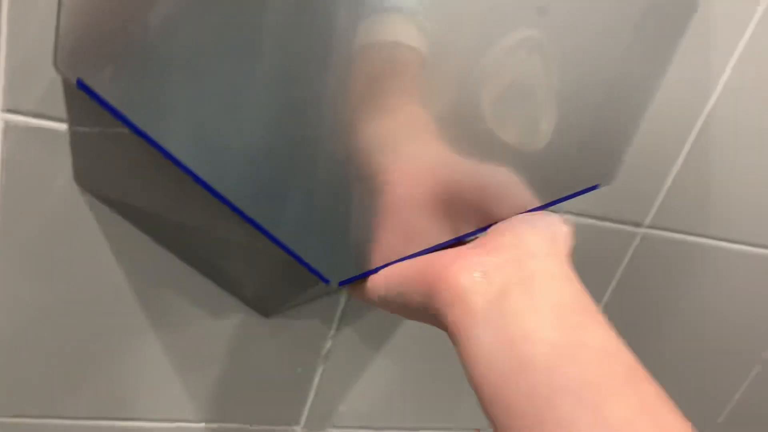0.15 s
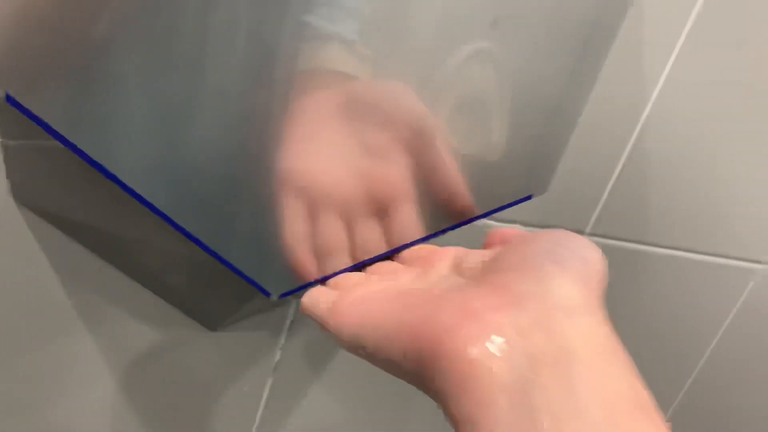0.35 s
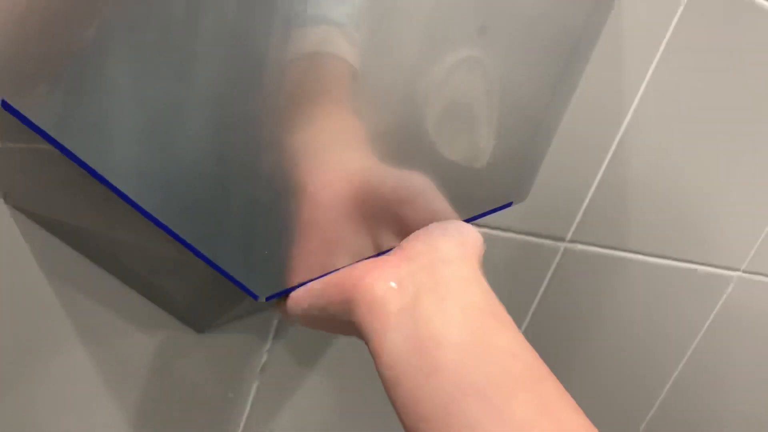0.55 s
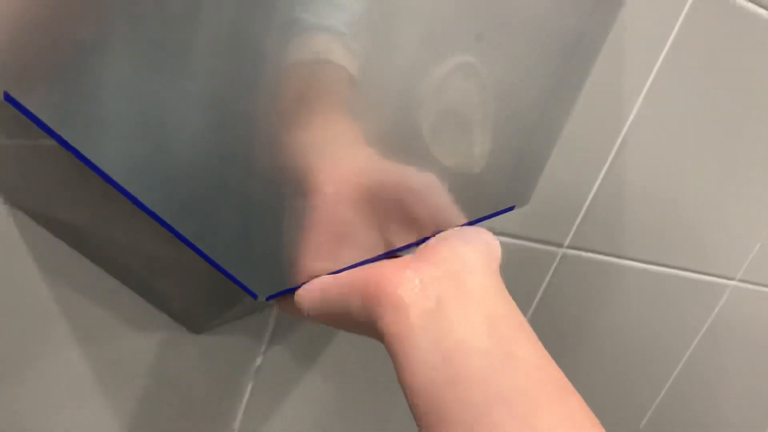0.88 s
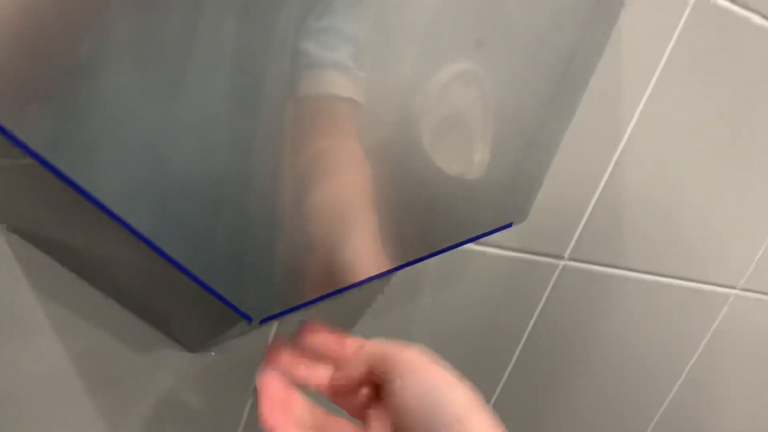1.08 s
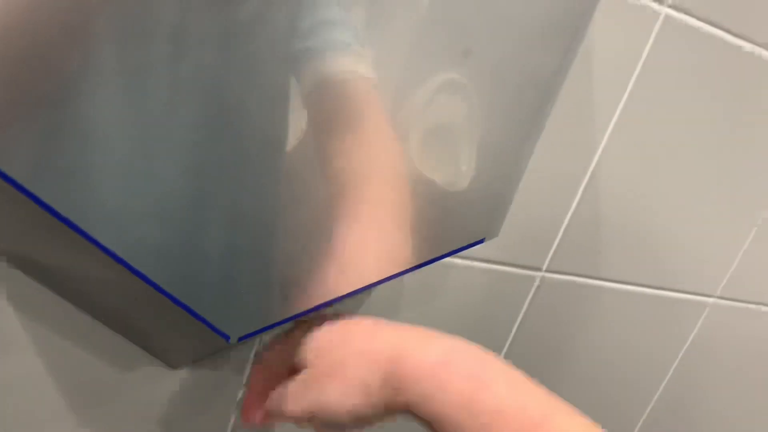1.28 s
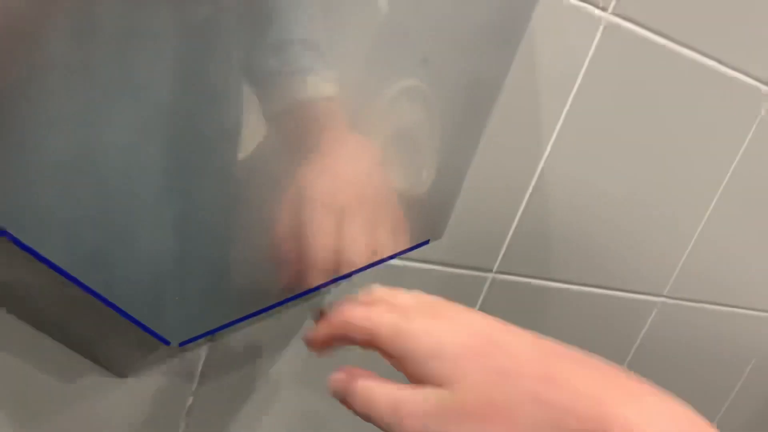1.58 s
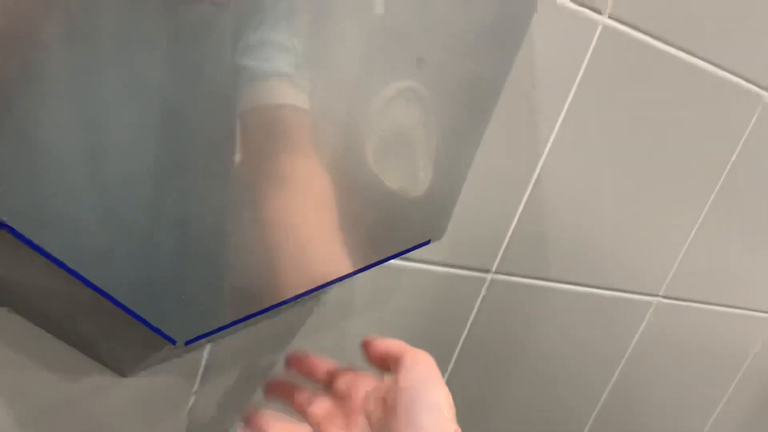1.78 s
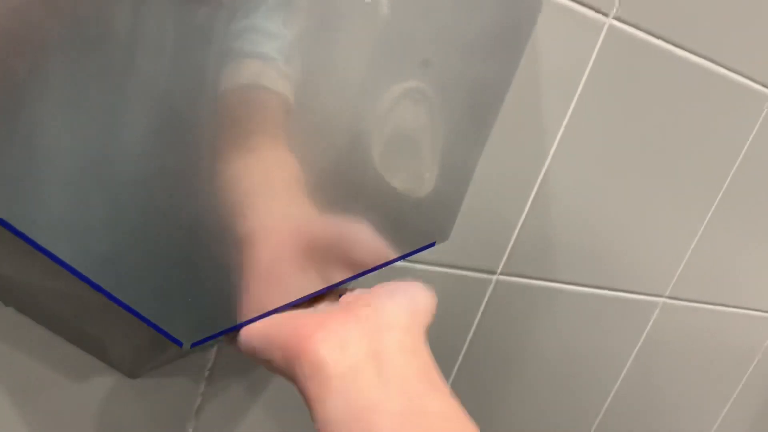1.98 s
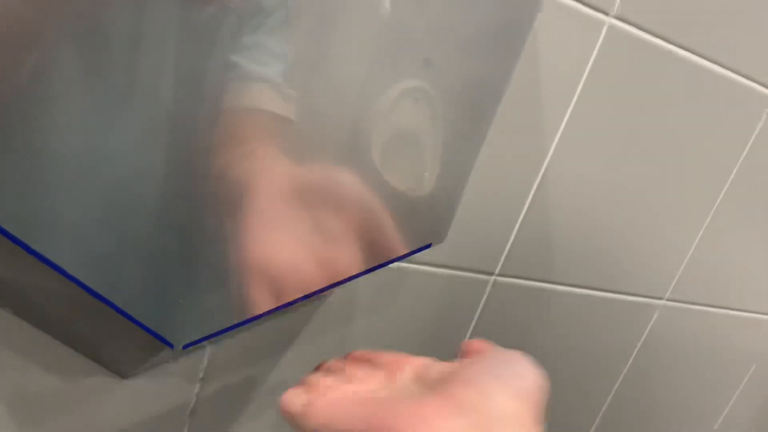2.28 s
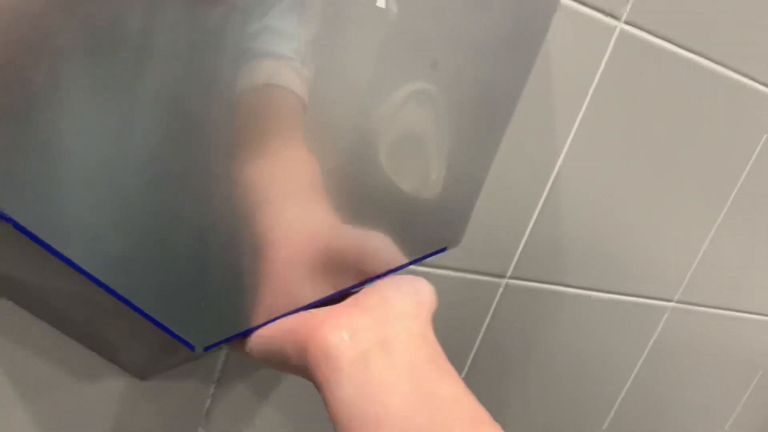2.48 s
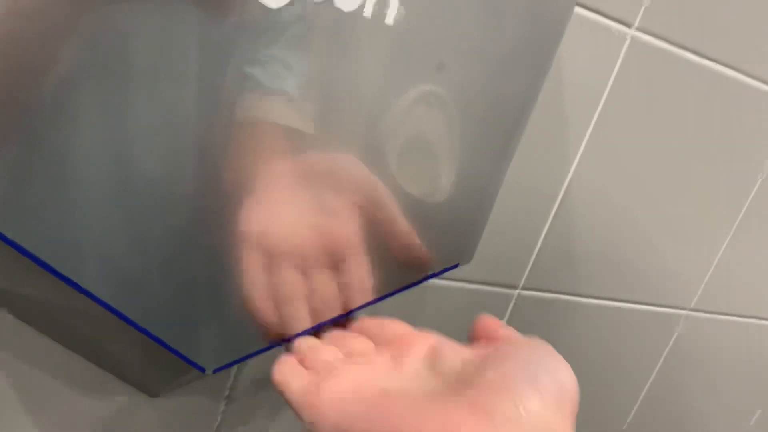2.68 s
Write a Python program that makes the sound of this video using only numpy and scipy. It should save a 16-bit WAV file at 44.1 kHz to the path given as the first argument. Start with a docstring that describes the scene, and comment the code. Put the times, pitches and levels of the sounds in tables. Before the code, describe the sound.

Close to a wall-mounted hand dryer, bright airflow shifts in tone as hands move through it, above mains hum and dull blower noise; air buffets the microphone around one second, then around two and two and a half.

```python
"""A wall-mounted hand dryer in a tiled washroom, heard from close by, in stereo.
From the start its jet hisses and rushes over turning hands (shaped noise with moving echoes), above a
mains hum (sine partials), a low roar (dull noise) and a faint whine (a wandering sine) that soon thins out.
Just before one second the hands throw air at the microphone: noise rumbles, falling sines thump, puffs graze it.
The whine swells after the middle; just past two seconds and again near two and a half, more air strikes."""
import sys
import numpy as np
from scipy import signal
from scipy.fft import rfft, irfft
from scipy.io import wavfile

SR = 44100
rng = np.random.default_rng(int(sys.argv[2]) if len(sys.argv) > 2 else 0)


def store_wav(level_fs):
    """Save 16-bit WAV to argv[1]."""
    pcm = np.round(np.clip(np.atleast_2d(level_fs), -1, 1) * 32767)
    wavfile.write(sys.argv[1], SR, pcm.T.astype(np.int16))


N = 125685

# share of the sizzle and rush that arrives straight, not off the tiles: [f/Hz, share 0-1]
DIRECT_SHARE = [(300, 1), (800, 0), (1700, .1), (2700, .48), (3600, .3), (4600, .15), (5500, .28),
                (6500, .5), (7500, .58), (8000, .95)]
# direct sound reaches the two ports out of step: [f/Hz, lead of the left port/rad]
PORT_PHASE = [(1400, 0), (1900, -3.4), (3000, -3.2), (4400, -.8), (5400, -2.3), (6400, -.3), (7400, -1.4),
              (8100, -3), (8900, -3.4), (10500, -6.1), (11500, -6.5), (12800, -9.1), (13700, -9.6),
              (15400, -12.5)]
# low noise at the two ports: [f/Hz, left-right likeness 0-1]
LOW_LIKENESS = [(250, 1), (400, .9), (600, .7), (850, .52), (1300, .42), (1800, .05)]

SKIN_ECHO_DB, HOLLOW_ECHO_DB = -8, -7


def from_db(db):
    """Decibels to gain."""
    return 10 ** (np.asarray(db) / 20)


def rms_one(x):
    """Scale to unit power."""
    return x / np.sqrt(np.mean(x ** 2) + 1e-20)


def in_time(rows):
    """A curve read at every sample."""
    return np.interp(np.arange(N) / SR, *np.transpose(rows))


def over_hz(points):
    """A table read at every frequency, on a log axis."""
    hz, value = np.transpose(points)
    bins_hz = np.arange(N // 2 + 1) * SR / N
    return np.interp(np.log(bins_hz + 1), np.log(hz), value)


def drift(rate):
    """Slow random motion of spread 1: noise through two equal poles at the rate in Hz."""
    step = 40  # samples between drawn values
    r = np.exp(-2 * np.pi * rate * step / SR)
    noise = rng.standard_normal(N // step + 2002)
    slow = signal.lfilter([1], [1, -2 * r, r * r], noise)[2000:]  # drop the settling time
    return np.interp(np.arange(N) / step, np.arange(len(slow)), rms_one(slow))


def flutter(db, rate):
    """Turbulent flicker of the flow, as a gain."""
    return from_db(db * drift(rate))


def cut(x, hz, kind, order):
    """Butterworth low- or high-pass."""
    return signal.sosfilt(signal.butter(order, hz, kind, fs=SR, output="sos"), x)


def air(spectrum, direct, phase):
    """Turbulent noise: a direct part shared by both ports, out of step, and a diffuse part off the tiles."""
    straight, left, right = rfft(rng.standard_normal((3, N)))
    share = np.clip(direct, 0, 1)
    direct_part = np.sqrt(share) * np.array([straight * np.exp(1j * phase), straight])
    diffuse_part = np.sqrt(1 - share) * np.array([left, right])
    return rms_one(irfft((direct_part + diffuse_part) * from_db(over_hz(spectrum)), N))


def echoes(x, db):
    """Early echoes colour the noise with narrow peaks and dips, which shift as the hands turn."""
    count, change_hz = 14, 1.93
    out = x.copy()
    for delay_s in rng.uniform(.002, .033, size=count):  # off wall, floor and casing
        gain = drift(change_hz) * from_db(db) / np.sqrt(count)
        out = out + gain * np.roll(x, int(delay_s * SR), axis=-1)
    return rms_one(out)


def lean_left(x):
    """The low middle is louder at the left port."""
    # balance of the low sounds: [f/Hz, left minus right/dB]
    balance = [(330, 0), (500, 3.5), (800, 5), (1100, 4.5), (1400, 2.5), (2000, 2)]
    return irfft(rfft(x) * from_db(over_hz(balance) * [[.5], [-.5]]), N)


def slot_hiss():
    """The thin jet leaves the slot as bright, mostly direct noise that flickers fast."""
    # tone of the hiss: [f/Hz, density/dB per Hz]
    spectrum = [(3000, -38), (6000, -22), (7600, -12), (7900, -6), (8200, -.3), (10000, 0), (11500, -1.2),
                (13000, -1.2), (15600, .8)]
    # ride of the hiss, before its trim: [t/s, level/dB]
    level = [(0, -31), (.09, -30.5), (.16, -29), (.24, -30.5), (.35, -27.5), (.46, -31), (.53, -28.5),
             (.83, -31.5), (.89, -29), (1.12, -33), (1.38, -28), (1.53, -27.5), (1.63, -32.5), (1.88, -32),
             (2.1, -26.5), (2.28, -31.5), (2.68, -27), (2.85, -33)]
    direct_share, echo_db, trim_db = .95, -11, 3.5
    hiss = echoes(air(spectrum, direct_share, over_hz(PORT_PHASE)), echo_db)
    return hiss * from_db(trim_db + in_time(level)) * flutter(db=1.0, rate=66)


def skin_rush():
    """Air breaks on the hands as a mid-range rush, part direct and part off the tiles."""
    # tone of the rush: [f/Hz, density/dB per Hz]
    spectrum = [(700, -18.5), (1500, -15), (2000, 0.5), (2750, 2), (3500, -0.5), (4500, -12.5), (8000, -19)]
    # ride of the rush, before its trim: [t/s, level/dB]
    level = [(0, -34), (.33, -37), (.6, -36), (1.0, -36), (1.19, -41.5), (1.33, -40.5), (1.59, -33.5),
             (1.83, -39.5), (2.12, -36), (2.35, -36), (2.62, -35.5), (2.85, -34.5)]
    trim_db = -2
    rush = echoes(air(spectrum, over_hz(DIRECT_SHARE), over_hz(PORT_PHASE)), SKIN_ECHO_DB)
    return rush * from_db(trim_db + in_time(level)) * flutter(db=1.5, rate=16)


def finger_sizzle():
    """Air skims the fingers as a crisp band of noise between the rush and the hiss."""
    # tone of the sizzle: [f/Hz, density/dB per Hz]
    spectrum = [(2800, -17.5), (4000, 0.5), (5300, 1), (6300, -0.5), (7400, 2), (8200, -37), (12000, -32)]
    # ride of the sizzle: [t/s, level/dB]
    level = [(0, -40), (.2, -41), (.33, -36.5), (.45, -38), (.6, -37), (.85, -39), (.98, -37),
             (1.18, -44.5), (1.35, -38.5), (1.55, -36), (1.7, -40.5), (1.86, -40.5), (2.0, -35),
             (2.13, -31.5), (2.3, -40), (2.45, -36.5), (2.67, -36), (2.85, -41.5)]
    sizzle = echoes(air(spectrum, over_hz(DIRECT_SHARE), over_hz(PORT_PHASE)), SKIN_ECHO_DB)
    return sizzle * from_db(in_time(level)) * flutter(db=0.98, rate=18)


def palm_roar_and_wrist_whoosh():
    """Air roars in the hollow of the palms and spills past the wrists; both flicker together."""
    # tones of roar and whoosh: [f/Hz, density/dB per Hz]
    roar_spectrum = [(300, -41), (600, -8.5), (800, -3), (970, 7), (1200, 4), (1600, 5.5), (2000, -5.5),
                     (4000, -32.5)]
    whoosh_spectrum = [(200, -7.5), (340, -4.5), (440, 4), (560, 5), (740, -1.5), (900, 2), (1400, -44)]
    # rides of roar (before its trim) and whoosh: [t/s, level/dB]
    roar_level = [(0.0, -33), (0.1, -40.5), (0.25, -40), (0.3, -37), (0.44, -37.5), (0.58, -44),
                  (0.7, -38.5), (0.82, -41.5), (1.0, -38.5), (1.22, -41), (1.52, -38), (1.65, -34),
                  (1.78, -39.5), (2.11, -38), (2.16, -41.5), (2.26, -37), (2.63, -40.5), (2.85, -36.5)]
    whoosh_level = [(0.0, -40), (0.08, -46), (0.24, -45.5), (0.32, -42), (0.58, -46.5), (0.67, -42.5),
                    (1.08, -43), (1.22, -44.5), (1.62, -40.5), (1.93, -42.5), (2.13, -43.5), (2.2, -46),
                    (2.37, -40.5), (2.58, -50), (2.64, -47.5), (2.72, -53), (2.85, -45.5)]
    roar_trim_db = -1.5
    likeness = over_hz(LOW_LIKENESS)
    roar = echoes(air(roar_spectrum, likeness, 0), HOLLOW_ECHO_DB)
    roar = roar * from_db(roar_trim_db + in_time(roar_level))
    whoosh = echoes(air(whoosh_spectrum, likeness, 0), HOLLOW_ECHO_DB)
    whoosh = whoosh * from_db(in_time(whoosh_level))
    return lean_left(roar + whoosh) * flutter(db=1.5, rate=18)


def thumps():
    """An eddy hits the microphone: a quick, ragged pressure swing that slows as the eddy spreads."""
    # single eddies: [t/s, level/dB, rise/s, fall/s, starting pitch/Hz, time until the pitch has halved/s]
    eddies = [(0.885, -14.5, 0.0021, 0.0064, 1010, .0012), (0.9469, -8.5, 0.0026, 0.033, 1200, 0.00131),
              (.955, -19.5, 0.0024, .004, 920, 0.0067), (.972, -20.5, 0.0029, 0.0063, 1200, 0.00244),
              (0.989, -24, 0.0016, 0.0042, 900, .003), (0.992, -11, 0.0066, 0.014, 230, 0.0065),
              (2.049, -29, 0.0034, 0.0088, 918, 0.00315), (2.422, -19, 0.0012, 0.0063, 713, .003),
              (2.433, -21, 0.0031, 0.012, 333, 0.011), (2.463, -19.5, 0.0046, 0.0079, 397, 0.0029),
              (2.5087, -17.5, 0.0038, 0.0067, 2080, 0.0012), (2.514, -9.5, 0.0069, 0.023, 262, 0.0078)]
    ragged = 0.14 * drift(166)  # rad; turbulence makes each swing uneven
    out = np.zeros(N)
    for s, db, rise, fall, start_hz, halving in eddies:
        age = np.maximum(np.arange(N) / SR - s, 0)
        phase = 2 * np.pi * start_hz * halving * np.log1p(age / halving)
        shape = np.minimum(age / rise, 1) * np.exp(-(np.maximum(age - rise, 0) / fall) ** 2)
        out += from_db(db) * shape * np.sin(phase + ragged)
    return out


def gusts():
    """Deflected air rumbles in lumps on the microphone; small eddies differ between the ports."""
    # lumps of air: [t/s, length before release/s, level/dB, upper edge/Hz]
    lumps = [(0.208, .02, -43, 75), (0.762, 0.034, -40.5, 140), (0.892, 0.02, -22.5, 113),
             (0.943, 0.05, -36, 600), (0.971, 0.055, -23.5, 132), (1.013, 0.014, -26.5, 122),
             (1.05, 0.041, -32, 260), (2.005, 0.067, -32, 443), (2.021, 0.045, -26, 140),
             (2.102, 0.017, -35, 448), (2.112, 0.085, -36, 138), (2.421, 0.038, -19.5, 450),
             (2.424, 0.058, -24.5, 190), (2.484, 0.024, -24.5, 333), (2.63, 0.064, -37.5, 169)]
    # gusts at the two ports: [f/Hz, left-right likeness 0-1]
    likeness = [(300, 1), (450, .88), (620, .55), (800, .1)]
    attack_s, release_s = 0.0027, 0.01
    t, out = np.arange(N) / SR, np.zeros((2, N))
    white = [(1, 0)]  # flat spectrum
    draught = lean_left(air(white, over_hz(likeness), 0)) * flutter(db=0.5, rate=38)
    for s, length, db, edge_hz in lumps:
        stretch = np.roll(draught, rng.integers(N), axis=-1)  # another stretch for each gust
        rumble = cut(stretch, edge_hz, "low", order=4)
        low_edge_hz = 51.7 + 0.063 * edge_hz
        rumble = rms_one(cut(rumble, low_edge_hz, "high", order=3))
        attack = np.clip((t - s) / attack_s, 0, 1)
        release = np.exp(-np.maximum(t - s - length, 0) / release_s)
        out += from_db(db) * attack * release * rumble
    return out


def puffs():
    """Brief, papery puffs of band-passed noise graze mainly the left port."""
    # small puffs: [t/s, level at the left before rise and decay/dB, decay/s, centre f/Hz]
    grazes = [(.28, -40, .06, 1280), (.885, -32, .005, 800), (1.063, -38, 0.025, 750),
              (2.049, -29, 0.013, 700), (2.097, -27.5, 0.025, 940), (2.42, -26, 0.016, 850),
              (2.5072, -20, 0.0055, 1360), (2.621, -25, 0.014, 990)]
    rise_s, right_db = 0.0035, -12
    out = np.zeros((2, N))
    for s, db, decay, hz in grazes:
        age = np.maximum(np.arange(N) / SR - s, 0)
        band = cut(rng.standard_normal((2, N)), hz, "low", order=3)
        band = cut(band, hz, "high", order=3)  # both edges meet at the centre
        shape = np.minimum(age / rise_s, 1) * np.exp(-age / decay)
        out += from_db(db) * shape * rms_one(band)
    return out * from_db([[0], [right_db]])


def mains_hum():
    """The mains hum is a sine with overtones locked in phase, each wavering in level on its own."""
    # partials: [multiple of the hum, level against the hum ride/dB, waver/dB]
    partials = [(1, -3, -1.1), (2, -16.5, 3.5), (3, -30, 3.5)]
    # ride of the hum: [t/s, level/dB]
    level = [(0, -32), (.3, -33.5), (.58, -30.5), (.8, -29.5), (1.18, -33), (1.4, -31.5), (1.65, -29),
             (1.95, -27.5), (2.3, -26.5), (2.65, -31), (2.85, -32.5)]
    hum_hz, phase_wander_rad = 100.1, 0.08
    phase = 2 * np.pi * hum_hz * np.arange(N) / SR + phase_wander_rad * drift(1.7)
    hum = np.zeros(N)
    for multiple, db, waver_db in partials:
        gain = from_db(in_time(level) + db) * flutter(waver_db, rate=8.6)
        hum += gain * np.sin(multiple * phase)
    return np.sqrt(2) * hum


def blower():
    """The blower makes a dull, low noise, much alike at both ports."""
    # tone of the blower: [f/Hz, density/dB per Hz]
    spectrum = [(25, -31), (45, -32), (65, -4), (120, -8), (175, 4), (230, 1), (290, -6), (340, -5),
                (450, -12), (800, -51), (2000, -64)]
    # ride of the blower, before its trim: [t/s, level/dB]
    level = [(0.0, -39.5), (0.12, -40), (0.35, -41), (0.58, -41), (0.72, -35), (1.2, -40.5), (1.45, -37),
             (1.62, -36.0), (1.9, -34.5), (2.3, -38), (2.66, -44), (2.85, -37)]
    trim_db = -1.5
    noise = lean_left(air(spectrum, over_hz(LOW_LIKENESS), 0))
    return noise * from_db(trim_db + in_time(level))


def motor_whine():
    """The motor whines as one thin sine, slightly unsteady in pitch and level."""
    # ride of the whine: [t/s, level/dB]
    level = [(0, -51), (.8, -67), (1.2, -51.5), (1.65, -43.5), (1.95, -48.5), (2.2, -56), (2.5, -48),
             (2.85, -61)]
    whine_hz, wander = 1407.6, .001  # wander as a share of the pitch
    pitch_hz = whine_hz * (1 + wander * drift(4.9))
    turn = 2 * np.pi * np.cumsum(pitch_hz) / SR
    return np.sqrt(2) * np.sin(turn) * from_db(in_time(level)) * flutter(db=2.0, rate=27)


def centre_bass(x):
    """The bass sits in the middle, below an edge that slowly sinks."""
    # edge below which the sound is centred: [t/s, f/Hz]
    mono_edge = [(0, 740), (1.3, 680), (1.6, 500), (2.1, 370), (2.55, 310), (2.85, 210)]
    hz, s, side = signal.stft((x[0] - x[1]) / 2, SR, nperseg=1024)
    above = (hz[:, None] / np.interp(s, *np.transpose(mono_edge))) ** 8
    side = signal.istft(side * above / (1 + above), SR)[1][:N]
    return x.mean(axis=0) + np.array([side, -side])


def scene():
    """The jet on the hands, its draught on the microphone and the motor behind, with the bass centred."""
    jet = slot_hiss() + skin_rush() + finger_sizzle() + palm_roar_and_wrist_whoosh()
    draught = thumps() + gusts() + puffs()
    motor = mains_hum() + blower() + motor_whine()
    return centre_bass(jet + draught + motor)


def record(dry):
    """The top is cut steeply."""
    cutoff_hz = 15650
    return signal.sosfilt(signal.ellip(12, .1, 90, cutoff_hz, fs=SR, output="sos"), dry)


dry = scene()
out = record(dry)
store_wav(out)
```